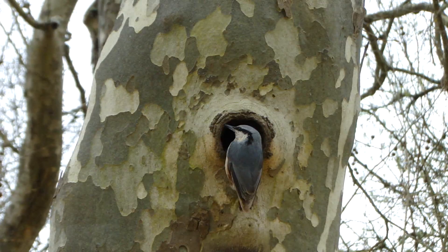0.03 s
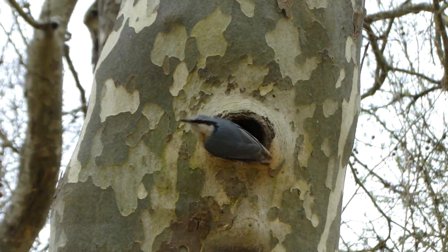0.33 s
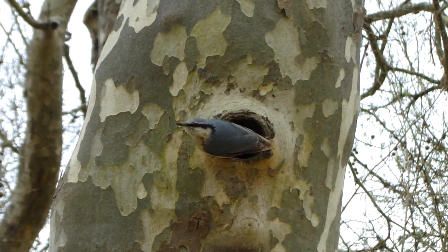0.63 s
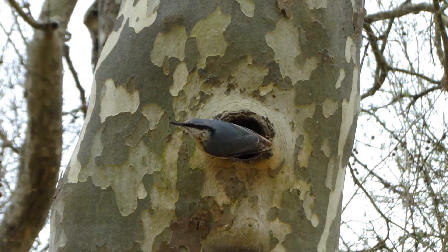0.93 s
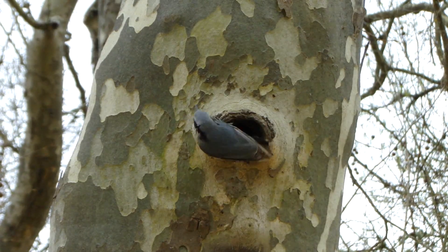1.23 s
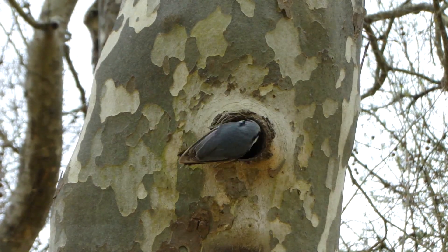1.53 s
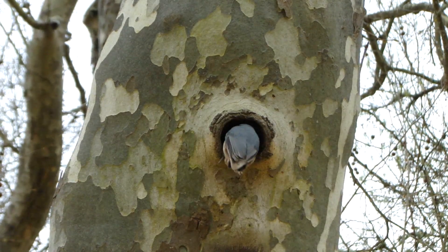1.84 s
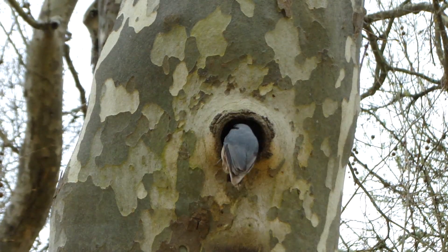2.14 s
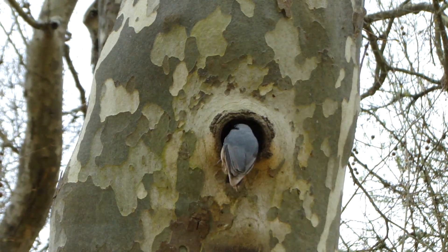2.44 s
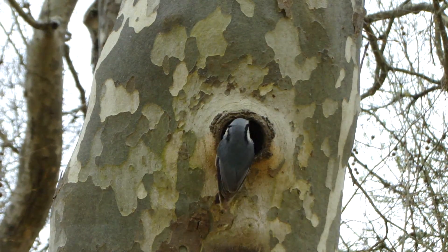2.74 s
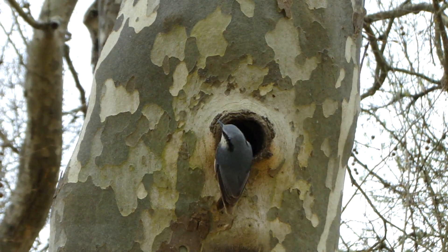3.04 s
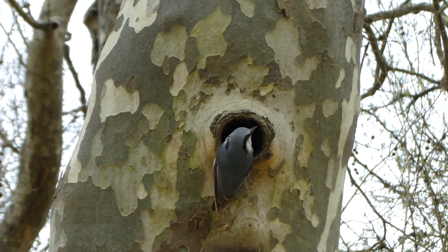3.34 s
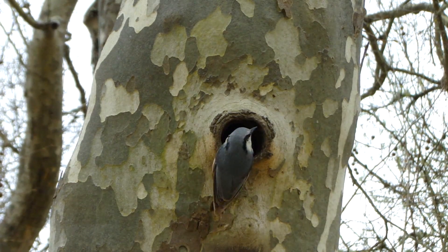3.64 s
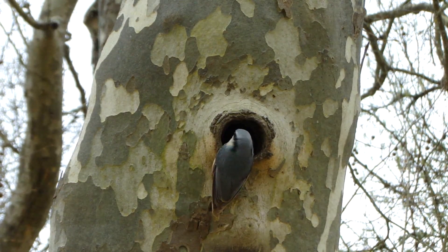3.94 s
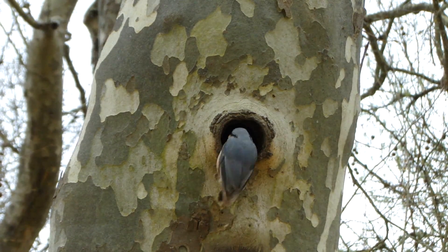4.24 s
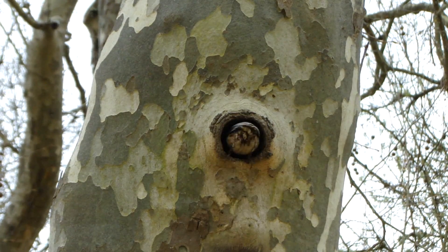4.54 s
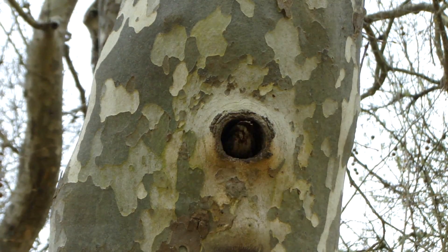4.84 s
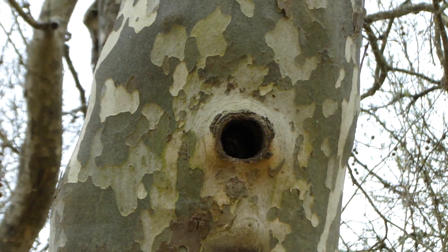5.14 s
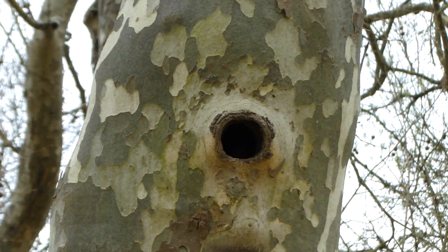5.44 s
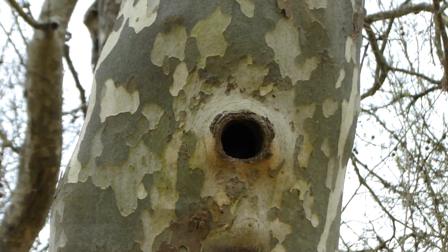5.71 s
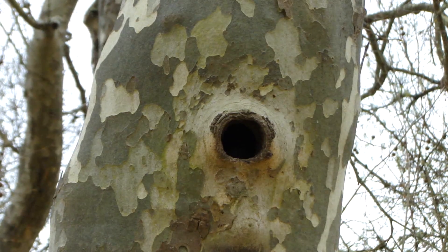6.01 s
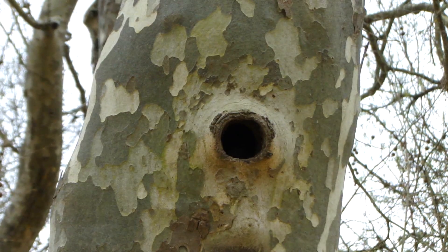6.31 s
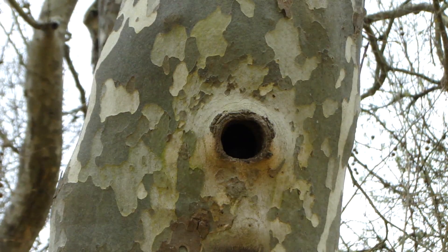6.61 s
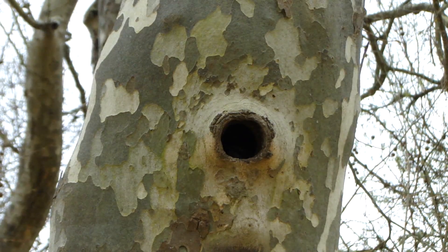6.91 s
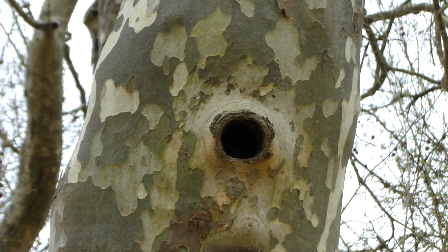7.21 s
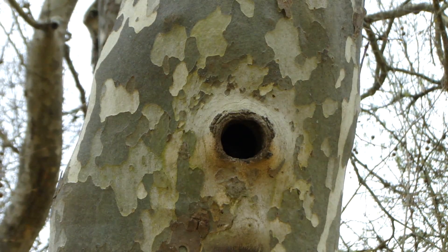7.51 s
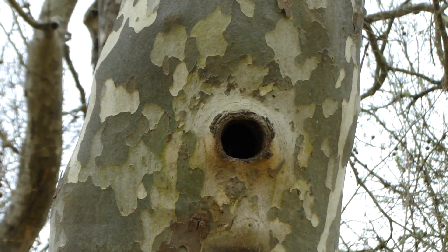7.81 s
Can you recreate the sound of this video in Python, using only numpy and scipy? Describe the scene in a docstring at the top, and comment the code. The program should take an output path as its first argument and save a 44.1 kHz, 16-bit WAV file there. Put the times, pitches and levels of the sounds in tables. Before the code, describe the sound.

A songbird's slurred whistles, sharp chips and thin ticks sound over a quiet wood, with four distant barks and three loud, close rising chirps.

```python
"""A songbird's slurred whistles, further off, and thin, close ticks sound over the hush of a bare wood.
It is early spring at a nuthatch's nest hole. Harsh chips and clear pips come from the left,
small birds twitter far off, a distant animal barks four times and light air bumps the microphone.
Three loud rising chirps sound close by near the end. Bird notes are gliding tones, barks are
pulses and noise ringing in a throat; branches and trunks scatter both."""
import sys
import numpy as np
from scipy import signal
from scipy.fft import rfft, irfft
from scipy.io import wavfile
from scipy.ndimage import uniform_filter1d

SR = 44100
rng = np.random.default_rng(int(sys.argv[2]) if len(sys.argv) > 2 else 0)


def to_wav(sig):
    """Store sig (one row per channel, or 1-D mono) as 16-bit WAV at the path in sys.argv[1].

    Samples outside -1..1 are clipped; the rate is SR.
    """
    pcm = np.clip(np.atleast_2d(sig), -1, 1) * 32767
    pcm = np.round(pcm).astype(np.int16)
    wavfile.write(sys.argv[1], SR, pcm.T)  # frames by channels


N = 346626
OPPOSED = np.array([[1], [-1]])   # channels in antiphase


def from_db(db):
    return 10 ** (np.asarray(db) / 20)


def unit_rms(x):
    return x / np.sqrt(np.mean(x ** 2) + 1e-20)


def clock(length_s):
    return np.arange(int(length_s * SR)) / SR


def add(out, start_s, sound):
    i = max(int(start_s * SR), 0)
    out[:, i:i + sound.shape[-1]] += sound[..., :max(N - i, 0)]


def band(x, low_hz, high_hz, order=2):
    return signal.sosfilt(signal.butter(order, [low_hz, high_hz], "band", fs=SR, output="sos"), x)


def resonance(x, hz, width_hz):
    r = np.exp(-np.pi * width_hz / SR)
    feedback = [1, -2 * r * np.cos(2 * np.pi * hz / SR), r * r]
    return signal.lfilter(np.array([1, 0, -1]) * (1 - r * r) / 2, feedback, x)


def wander(t, per_s, size=1024):
    """Gaussian values joined by lines."""
    return np.interp(t * per_s % size, np.arange(size), rng.standard_normal(size))


def swell(t, exponent):
    """Sine arch; a smaller exponent is squarer."""
    return np.abs(np.sin(np.pi * t / t[-1])) ** exponent


def coloured_noise(spectrum, size):
    """Unit-rms noise shaped by (f/Hz, level/dB) points."""
    hz, db = np.transpose(spectrum)
    bins_hz = np.arange(size // 2 + 1) * SR / size
    gain = from_db(np.interp(np.log(bins_hz + 1), np.log(hz), db))
    return unit_rms(irfft(rfft(rng.standard_normal(size)) * gain, size))


def syrinx(hz, partials=((1, 0),)):
    """Bird tone on a pitch track; partials as (multiple, level/dB)."""
    phase = 2 * np.pi * np.cumsum(hz) / SR
    return np.sqrt(2) * sum(from_db(db) * np.sin(k * phase) * (k * hz < SR / 2) for k, db in partials)


def place(x, pan_db, lead_ms):
    """Direction: left louder by pan_db, right earlier by lead_ms."""
    fine = signal.resample_poly(x, 4, 1)
    shift = round(lead_ms / 2000 * 4 * SR)
    i = 4 * np.arange(len(x))
    return np.array([from_db(side * pan_db / 2) * fine.take(i - side * shift, mode="clip")
                     for side in (1, -1)])


def woods(x, near_db, far_db, near_t60_s, far_t60_s):
    """Echoes only: a quick spray from near branches, a smooth, duller tail from far trunks."""
    t = clock(1.5)
    twigs = rng.standard_normal((2, len(t))) * (rng.random(len(t)) < .06) * (t > .004)
    near = band(twigs, 340, 8200, order=1) * from_db(-60 * t / near_t60_s)
    trunks = band(rng.standard_normal((2, len(t))), 110, 5900)
    far = trunks * from_db(-60 * t / far_t60_s) * (1 - np.exp(-t / .01))
    response = (from_db(near_db) * unit_rms(near) + from_db(far_db) * unit_rms(far)) / np.sqrt(2 * len(t))
    return signal.fftconvolve(x, response, axes=1)[:, :N]


# Hush spectra, in phase and in antiphase: f/Hz, density/dB
HUSH_MID_SPECTRUM = [(30, -50), (70, -22), (140, -6), (300, -2.5), (520, -5.5), (950, -8), (2000, -12.5),
                     (3000, -12.5), (4200, -16.5), (6000, -16.5), (11000, -22), (13000, -34)]
HUSH_SIDE_SPECTRUM = [(30, -50), (70, -48), (140, -43), (300, -12.5), (520, -9.5), (950, -8), (2000, -11),
                      (3000, -11.5), (4200, -15), (6000, -15), (11000, -23), (13000, -38)]


def hush(level_db=-54.5):
    """Far leaves hiss smoothly."""
    mid = coloured_noise(HUSH_MID_SPECTRUM, N)
    side = coloured_noise(HUSH_SIDE_SPECTRUM, N)
    return from_db(level_db) * (mid + side * OPPOSED)


# Breeze strength: t/s, level/dB
BREEZE_CURVE = [(0.35, -66.5), (1.1, -60), (2.34, -61.5), (2.73, -51), (3.13, -64.5), (4.41, -77),
                (5.83, -61), (6.0, -58.5), (7.06, -65), (7.86, -61.5)]
# Rumble spectrum: f/Hz, density/dB
RUMBLE_SPECTRUM = [(20, -41), (50, -17), (90, -18.5), (150, -5.5), (250, -17.5), (450, -13.5), (1000, -59),
                   (4000, -70)]


def breeze(gain_db=2.5):
    """Light air rumbles on the microphone in lumps, mostly in antiphase."""
    t = np.arange(N) / SR
    rumble = coloured_noise(RUMBLE_SPECTRUM, N) * OPPOSED + .5 * coloured_noise(RUMBLE_SPECTRUM, N)
    return rumble * from_db(gain_db + np.interp(t, *np.transpose(BREEZE_CURVE)) + 3 * wander(t, 25))


# Stronger puffs of air: t/s, length/s, level/dB
STRONG_PUFFS = [(.868, .13, -44.5), (1.637, 0.019, -33), (1.916, 0.053, -35.5), (2.38, 0.16, -40.5),
                (2.61, .14, -42.5), (2.765, 0.09, -31), (2.90, .06, -36), (5.10, 0.031, -40),
                (5.169, 0.037, -23), (5.393, 0.0147, -38.5), (5.803, 0.051, -38), (6.5, 0.023, -37)]


def air_bumps(gain_db=-1, puffs_per_s=6.4, puff_s=.02115, slot_s=.05, lumps_db=8.5):
    """Puffs thud on the microphone; small random ones grow with the breeze, strong ones reach higher."""
    out = np.zeros((2, N))
    slots = np.arange(0, N / SR, slot_s)
    moments = slots[rng.random(len(slots)) < puffs_per_s * slot_s]
    small_puffs = [(s, puff_s, np.interp(s, *np.transpose(BREEZE_CURVE)) + 10.5) for s in moments]
    for start_s, length_s, db in list(STRONG_PUFFS) + small_puffs:
        t = clock(length_s)
        top_hz = max(350 * from_db(.17 * (db + 31.5)), 200)
        side, mid = band(rng.standard_normal((2, SR)), 118.4, top_hz, order=3)[:, -len(t):]
        thud = unit_rms(side) * OPPOSED + .36 * unit_rms(mid)
        lumpy = unit_rms(thud * from_db(lumps_db * wander(t, 59.6)))
        add(out, start_s, lumpy * swell(t, .25) * from_db(db + gain_db))
    return band(out, 80, 1250)


# Twitter bouts: t/s, length/s, low f/Hz, high f/Hz, slurs per s, level/dB
TWITTER_BOUTS = [(0.198, 7.6, 3220, 7960, 6.8, -65), (1.099, 0.38, 3420, 3940, 69, -58.5),
                 (2.097, 2.0, 5560, 7950, 19, -61.5), (3.07, 0.11, 3583, 4500, 73, -58)]


def twitter(shake=.041):
    """Tiny random slurs of small, far birds, heard only as echoes from the trees."""
    out = np.zeros((2, N))
    for start_s, length_s, low_hz, high_hz, per_s, db in TWITTER_BOUTS:
        for when, height, size, slope, loudness in rng.random((int(per_s * length_s), 5)):
            t = clock(.02 + .04 * size)
            base_hz = low_hz * (high_hz / low_hz) ** height
            hz = base_hz * (1 + .2 * (slope - .5) * t / t[-1] + shake * wander(t, 900))
            add(out, start_s + when * length_s, syrinx(hz) * swell(t, 1) * from_db(db + 4 * loudness))
    return woods(out, near_db=0, far_db=-4, near_t60_s=.2, far_t60_s=.8)


# Far bird's notes: t/s, length/s, level/dB
FAR_BIRD_NOTES = [(0.355, 0.1, -58.5), (0.568, 0.15, -57), (3.86, 0.068, -54.5), (4.107, .15, -55.5),
                  (4.417, 0.1, -63.5), (5.40, 0.051, -63)]


def far_bird(gain_db=-3, pitch_hz=4140):
    """One thin, unsteady note, repeated and blurred by the trees."""
    out = np.zeros((2, N))
    for start_s, length_s, db in FAR_BIRD_NOTES:
        t = clock(length_s)
        hz = pitch_hz * (1 + .025 * wander(t, 600))
        add(out, start_s, syrinx(hz) * swell(t, .23) * from_db(db + gain_db))
    return out + woods(out, near_db=0, far_db=-3, near_t60_s=.25, far_t60_s=.8)


# Distant barks: t/s, length/s, pitch f/Hz, throat f/Hz, level/dB
BARK_CALLS = [(2.257, 0.23, 300.7, 574, -38.5), (2.93, 0.24, 291.2, 529, -41.5),
              (3.487, 0.231, 267.9, 515, -39.5), (4.438, 0.27, 283.5, 524, -40)]
# Upper throat resonances: f/Hz, width/Hz, level/dB
UPPER_FORMANTS = [(1445, 88, -12), (2260, 680, -28)]


def barks(gain_db=-3):
    """Uneven pulses and hoarse noise ring in a throat; distance blurs them."""
    out = np.zeros((2, N))
    for start_s, length_s, pitch_hz, throat_hz, db in BARK_CALLS:
        t = clock(length_s)
        arch = swell(t, .6)
        hz = pitch_hz * (.88 + .15 * arch + .06 * wander(t, 150))
        pulses = np.diff(np.floor(np.cumsum(hz) / SR), prepend=0)
        source = unit_rms(pulses) + 1.4 * rng.standard_normal(len(t))
        throat = resonance(source, throat_hz, width_hz=190)
        voice = unit_rms(resonance(throat, throat_hz, width_hz=425))
        for formant_hz, width_hz, formant_db in UPPER_FORMANTS:
            voice += from_db(formant_db) * unit_rms(resonance(source, formant_hz, width_hz))
        add(out, start_s, band(voice, 330, 2000, order=3) * arch * from_db(db + gain_db))
    mono_blur = woods(out, near_db=-6, far_db=-5.5, near_t60_s=.28, far_t60_s=1.22).mean(axis=0)
    return out + mono_blur + woods(out, near_db=-3, far_db=-8.5, near_t60_s=.7, far_t60_s=2.2)


# Songbird's whistles: t/s, length/s, start f/Hz, end f/Hz, level/dB, warble 0-1
WHISTLE_NOTES = [(0.201, 0.092, 2156, 2705, -41, 0.41), (0.271, .08, 2700, 2310, -37, 0.07),
                 (0.853, 0.18, 2685, 2366, -38.5, 0.82), (1.056, 0.15, 2930, 2835, -40.5, 0.01),
                 (1.297, 0.098, 2873, 2300, -36.5, 0.38), (1.479, 0.046, 2620, 2366, -38, 0),
                 (1.531, 0.11, 2650, 2240, -37.5, 0.52), (1.722, .078, 2795, 2675, -36.5, 0),
                 (1.806, 0.093, 2435, 2546, -38, 0.09), (2.119, 0.052, 2755, 1910, -44, .6),
                 (2.295, 0.13, 2212, 2595, -40, 0.19), (2.743, 0.072, 2414, 2190, -45, 0.86),
                 (2.827, 0.067, 2440, 2358, -40, 0.22), (2.94, .11, 3040, 2140, -39.5, 0.43),
                 (3.288, 0.084, 2660, 2690, -35, 0.13), (3.358, 0.25, 2570, 2333, -44, 0.18),
                 (5.932, 0.098, 2206, 2510, -40.5, 0.12), (6.223, .04, 2400, 2357, -35.5, 0.2),
                 (6.255, 0.11, 2355, 2934, -42, 0.22), (6.374, .075, 2363, 2486, -39.5, 0.2),
                 (7.388, 0.097, 2590, 2370, -41, 1), (7.527, .15, 2926, 1920, -40, 0.06),
                 (7.763, 0.091, 2330, 2575, -40, 1)]


def whistles(gain_db=-1, warble_hz=29, warble_depth=.083, sag_depth=.0495, sag_s=.0147):
    """Each note slides, slows and sags at its end; some warble quickly and unevenly."""
    out = np.zeros((2, N))
    for start_s, length_s, start_hz, end_hz, db, warble in WHISTLE_NOTES:
        t = clock(length_s)
        easing = 3.32 if end_hz > start_hz else .677
        slide_hz = start_hz + (end_hz - start_hz) * np.expm1(-easing * t / length_s) / np.expm1(-easing)
        shake = .8 * np.sin(2 * np.pi * warble_hz * t) + .35 * wander(t, 350)
        sag = sag_depth * np.exp((t - length_s) / sag_s)
        hz = slide_hz * (1 + (.0055 + warble_depth * warble) * shake - sag)
        envelope = swell(t, .31) * from_db(db + gain_db + 2.17 * wander(t, 139))
        add(out, start_s, place(syrinx(hz, [(1, 0), (2, -36)]) * envelope, pan_db=-3, lead_ms=.1))
    return out + woods(out, near_db=-7.5, far_db=-9.5, near_t60_s=.065, far_t60_s=1.5)


# Chip and pip partials at full roughness: multiple, level/dB
FALLING_PARTIALS = [(.5, -15.5), (1, -0.5), (1.5, -26), (2, -32), (2.5, -23)]


def falling_note(length_s, top_hz, octaves_per_s, rough):
    """A steady fall from the left; roughness shakes pitch and level and brings out the partials."""
    t = clock(length_s)
    hz = top_hz * 2 ** (-octaves_per_s * t) * (1 + (.025 + .06 * rough) * wander(t, 1200))
    partials = [(k, db + (k != 1) * 20 * np.log10(rough)) for k, db in FALLING_PARTIALS]
    envelope = swell(t, .21) * from_db(2.7 * rough * wander(t, 349))
    return place(syrinx(hz, partials) * envelope, pan_db=2.9, lead_ms=-.12)


# Harsh chips: t/s, length/s, level/dB
CHIP_NOTES = [(0.63, 0.096, -39.5), (1.571, 0.053, -38), (3.38, 0.098, -40.5), (4.155, 0.063, -39.5),
              (5.711, 0.082, -39.5), (6.441, 0.038, -38), (7.673, 0.084, -40)]
# Scratch of a rough voice: f/Hz, density/dB
SCRATCH_SPECTRUM = [(700, -24), (1500, -17.5), (2400, -7.5), (3500, 0), (4800, -3), (6500, -8.5),
                    (9000, -21.5), (12000, -19)]


def chips(note_db=-.5, scratch_db=-8.5, scratch_lead_s=.04):
    """Harsh falling notes swell out of a broad scratch."""
    out = np.zeros((2, N))
    for start_s, length_s, db in CHIP_NOTES:
        note = falling_note(length_s, top_hz=4590, octaves_per_s=7, rough=.85)
        add(out, start_s, from_db(db + note_db) * note)
        t = clock(length_s + 2 * scratch_lead_s)
        scratch = coloured_noise(SCRATCH_SPECTRUM, len(t)) * swell(t, .87)
        scratch *= from_db(db + scratch_db + 4.9 * wander(t, 281))
        add(out, start_s - scratch_lead_s, place(scratch, pan_db=1.4, lead_ms=-.074))
    return out + woods(out, near_db=1, far_db=-7, near_t60_s=.065, far_t60_s=1)


# Pips after some chips: t/s, level/dB
PIP_NOTES = [(1.663, -31.5), (4.245, -31), (6.527, -30.5)]


def pips(gain_db=1, echo_s=.277, echo_db=-18.5):
    """Clear, lower falling notes; a far bank of trees throws each back, blurred."""
    out = np.zeros((2, N))
    for start_s, db in PIP_NOTES:
        note = falling_note(length_s=.034, top_hz=3527, octaves_per_s=6.5, rough=.047)
        add(out, start_s, from_db(db + gain_db) * note)
    scattered = woods(out, near_db=-.5, far_db=-6.5, near_t60_s=.19, far_t60_s=.75)
    echo = woods(out, near_db=3, far_db=-3.5, near_t60_s=.22, far_t60_s=.72)
    add(out, echo_s, from_db(echo_db) * echo)
    return out + scattered


# Thin ticks: t/s, length/s, top f/Hz, level/dB
TICK_NOTES = [(0.25, 0.025, 7430, -30.5), (0.833, 0.026, 7190, -31.5), (1.397, 0.027, 7280, -36.5),
              (5.694, 0.026, 7370, -29.5)]
# Arch of a tick: share of length, pitch ratio, level/dB
TICK_CONTOUR = [(0, .74, -9), (.2, .93, -5.5), (.45, 0.99, 3), (.75, 0.96, -1.5), (1, .89, -12)]
# Tick partials: multiple, level/dB
TICK_TIMBRE = [(.5, -13.5), (1, -2), (1.5, -11.5)]


def ticks(fizz_db=-17):
    """Very short, high notes arch over in a little fizz."""
    out = np.zeros((2, N))
    share, ratio, contour_db = np.transpose(TICK_CONTOUR)
    for start_s, length_s, top_hz, db in TICK_NOTES:
        progress = clock(length_s) / length_s
        hz = top_hz * uniform_filter1d(np.interp(progress, share, ratio), size=150)
        note = syrinx(hz, TICK_TIMBRE) * from_db(db + np.interp(progress, share, contour_db))
        add(out, start_s, place(note, pan_db=.21, lead_ms=.015))
        t = clock(2 * length_s)
        fizz = unit_rms(band(rng.standard_normal((2, len(t))), 2500, 11500))
        add(out, start_s - length_s / 2, fizz * swell(t, 1.1) * from_db(db + fizz_db))
    return out + woods(out, near_db=-8, far_db=-18, near_t60_s=.12, far_t60_s=.5)


# Close chirps: t/s, length/s, low f/Hz, high f/Hz, start level/dB, end level/dB, pan/dB,
# trunk echo gain, rasp/dB, 4th harmonic/dB, dive accent/(dB per octave)
CHIRP_NOTES = [(6, .087, 2425, 2788, -26.5, -17.5, -10, 0.39, -12.5, -41, 5.5),
               (6.492, 0.095, 2444, 2796, -27.5, -22, -4, 0.16, -15, -52, -3.5),
               (7.105, .101, 2427, 3084, -25, -22, -1.5, 0.37, -28, -30, -4)]
# Dive into a chirp: t/s from its start, pitch ratio, level/dB, roughness
CHIRP_DIVE = [(-.022, 3.0, -27, 1.22), (-.012, 3.3, -22, 0.8), (-.008, 2.7, -14.5, 0.7),
              (-.004, 1.7, -1, 0.48), (0, 1.17, 1.5, .15), (.006, 1.04, 0, 0.05)]
# Flick out of it: t/s from its end, pitch ratio, level/dB, roughness
CHIRP_FLICK = [(0, 1.0, 0, .01), (.005, 1.2, -6, .2), (.009, 1.52, -14, .5), (.014, 1.1, -8, .45),
               (.019, .76, -17, .7), (.024, .7, -45, .7)]
# Chirp partials: multiple, level/dB
CHIRP_TIMBRE = [(.5, -43), (1, 0), (1.5, -34), (2, -37)]
# Crack in the voice: f/Hz, density/dB
CRACK_SPECTRUM = [(1200, -11), (2200, 4.5), (3500, 3), (5000, -1), (7500, -3.5), (10000, -10), (12500, -13)]


def chirps(climb_after_s=.0246, crack_db=-6.5, trunk_delay_s=.007, scatter_db=-8.5):
    """The pitch dives, climbs as the bird pushes, then flicks; the voice cracks at both ends."""
    out, to_woods = np.zeros((2, 2, N))
    for (start_s, length_s, low_hz, high_hz, start_db, end_db, pan_db,
         echo_gain, rasp_db, shrill_db, dive_db) in CHIRP_NOTES:
        dive = [(s, low_hz * ratio, start_db + db + dive_db * np.log2(ratio), rough)
                for s, ratio, db, rough in CHIRP_DIVE]
        rest = [(climb_after_s, low_hz, start_db, from_db(rasp_db))]
        flick = [(length_s + s, high_hz * ratio, end_db + db, rough)
                 for s, ratio, db, rough in CHIRP_FLICK]
        knots_s, *columns = np.transpose(dive + rest + flick)
        t = knots_s[0] + clock(knots_s[-1] - knots_s[0])
        glide_hz, db, rough = [np.interp(t, knots_s, column) for column in columns]
        hz = uniform_filter1d(glide_hz, size=90) * (1 + .005 * wander(t, 250))
        noise = band(rng.standard_normal(len(t)), 300, 1800)
        flutter = unit_rms(resonance(noise, hz=646, width_hz=98))
        voice = syrinx(hz, CHIRP_TIMBRE + [(4, shrill_db)]) * (1 + .85 * rough * flutter)   # sidebands
        voice += from_db(crack_db) * rough * np.sqrt(hz / low_hz) * coloured_noise(CRACK_SPECTRUM, len(t))
        voice *= from_db(db + .7 * wander(t, 200))
        voice = band(voice, 1600, 16000, order=3)   # the voice carries no lows
        voice += echo_gain * np.interp(t - trunk_delay_s, t, voice, left=0)   # beats against the glide
        add(out, start_s + t[0], place(voice, pan_db, lead_ms=.03))
        add(to_woods, start_s + t[0], from_db(scatter_db) * voice)
    return out + woods(to_woods, near_db=0, far_db=-11.5, near_t60_s=.27, far_t60_s=1)


def scene():
    birds = chirps() + ticks() + whistles() + chips() + pips() + far_bird() + twitter()
    return birds + barks() + hush() + breeze() + air_bumps()


def record(dry, open_s=.1633, fade_s=.014, cutoff_hz=12700):
    """The microphone opens after a moment; a steep low-pass cuts the top."""
    opened = np.clip((np.arange(N) / SR - open_s) / fade_s, 0, 1)
    return signal.sosfilt(signal.ellip(10, .3, 80, cutoff_hz, fs=SR, output="sos"), dry * opened)


dry = scene()
out = record(dry)
to_wav(out)
```